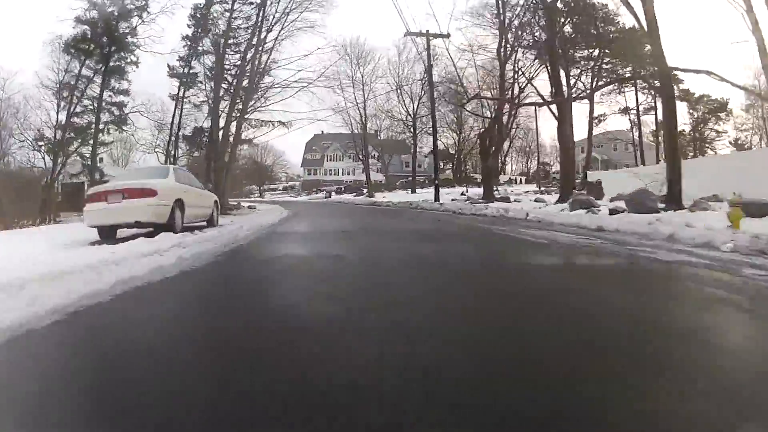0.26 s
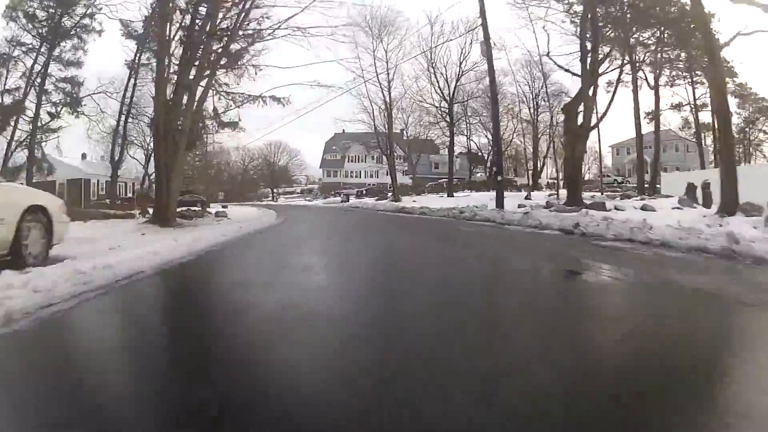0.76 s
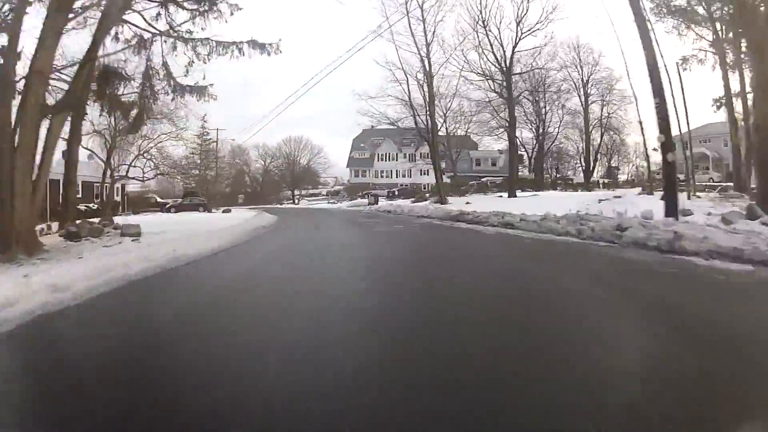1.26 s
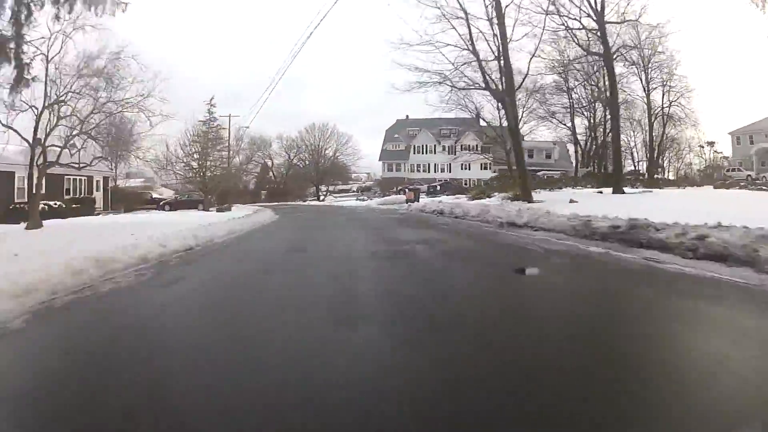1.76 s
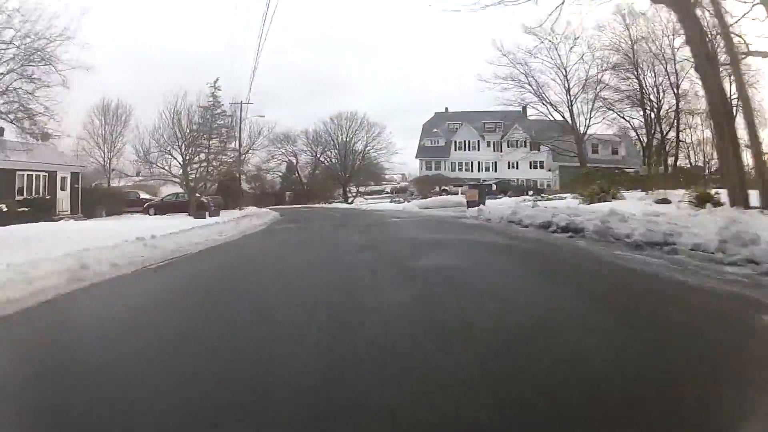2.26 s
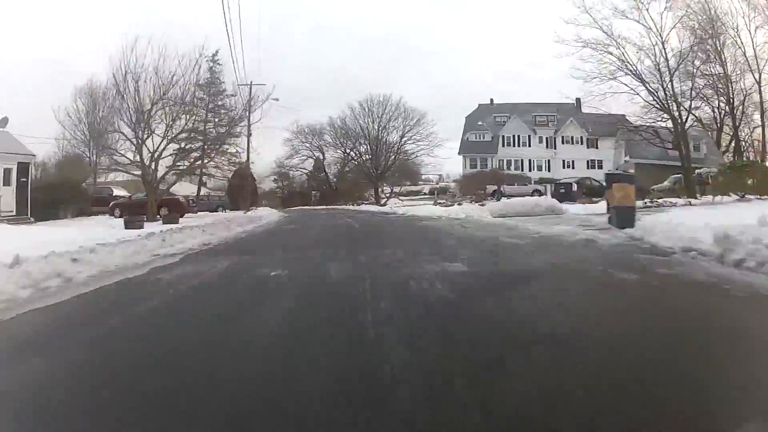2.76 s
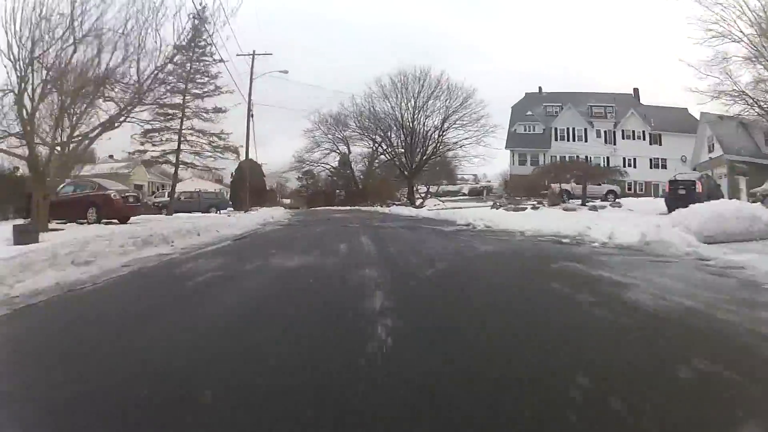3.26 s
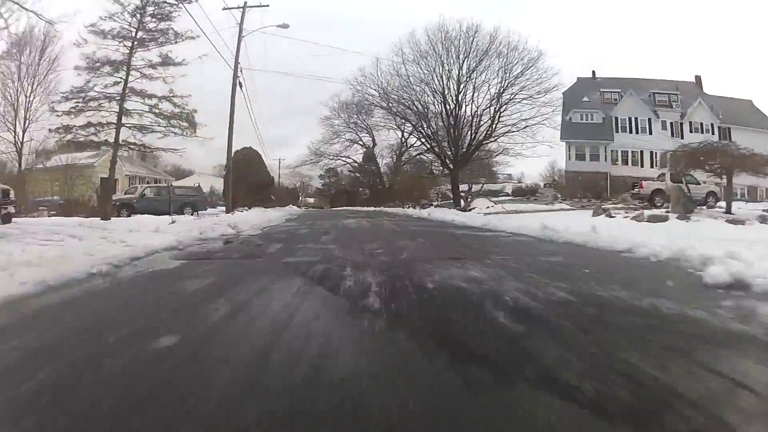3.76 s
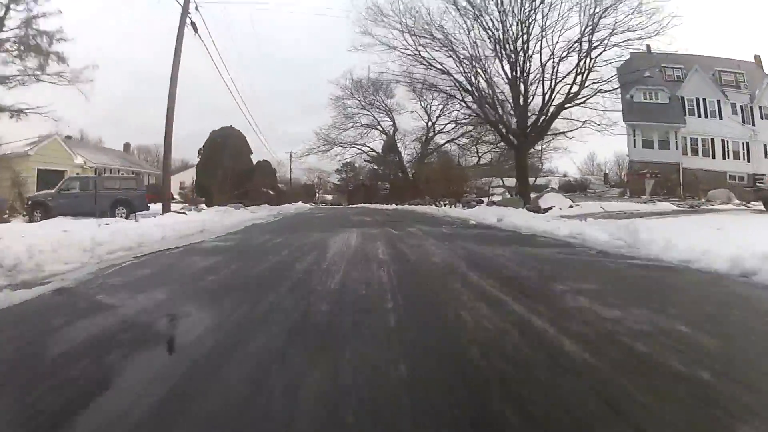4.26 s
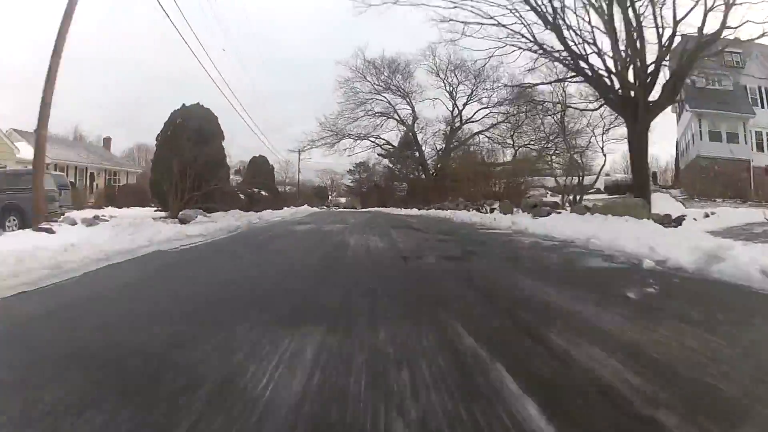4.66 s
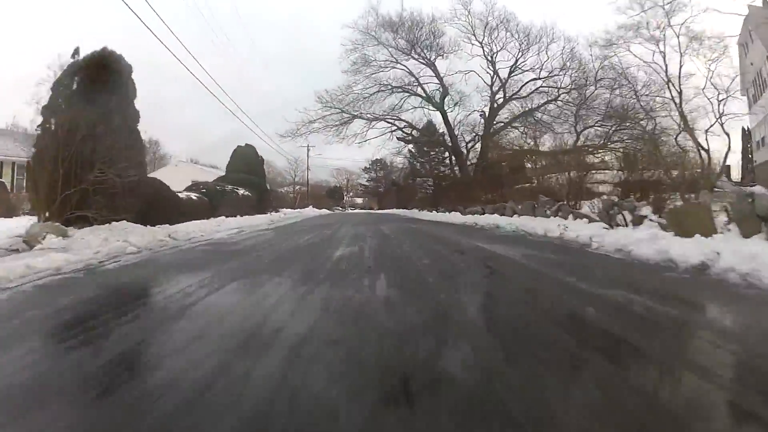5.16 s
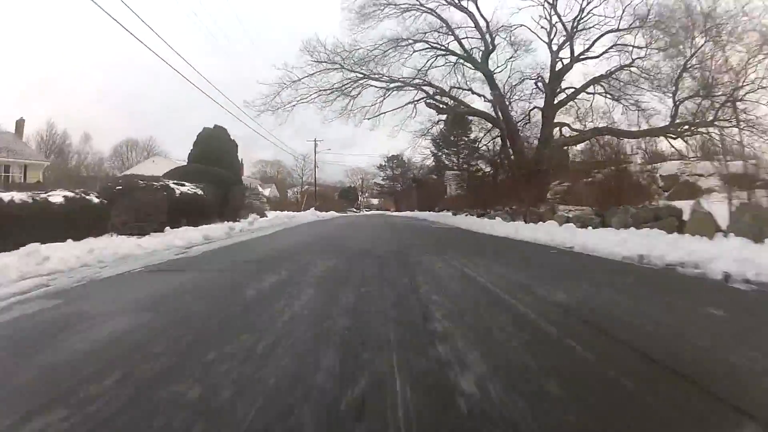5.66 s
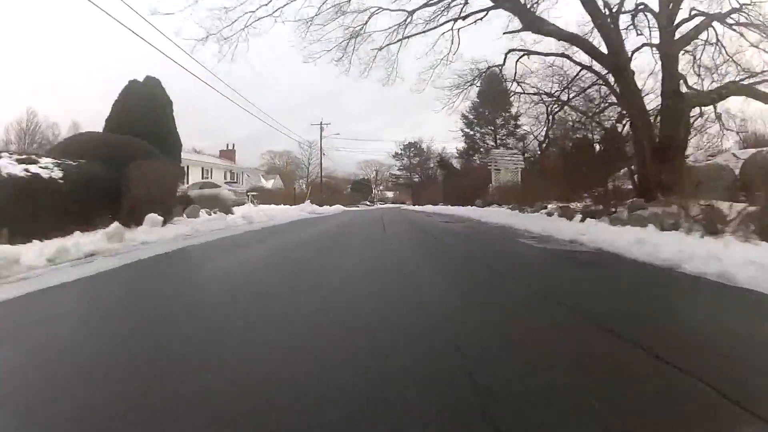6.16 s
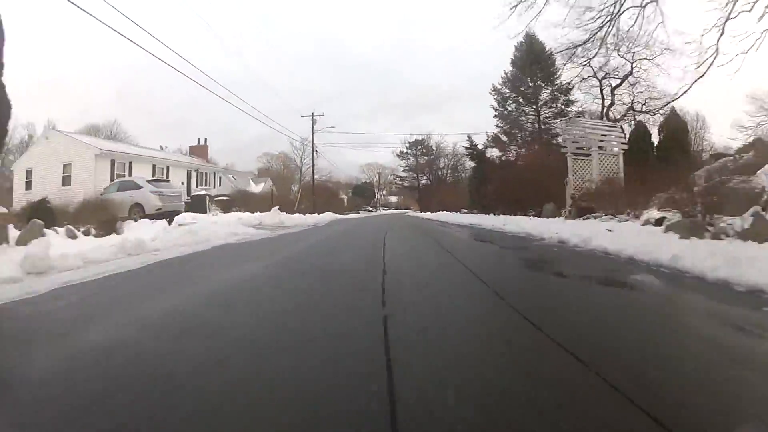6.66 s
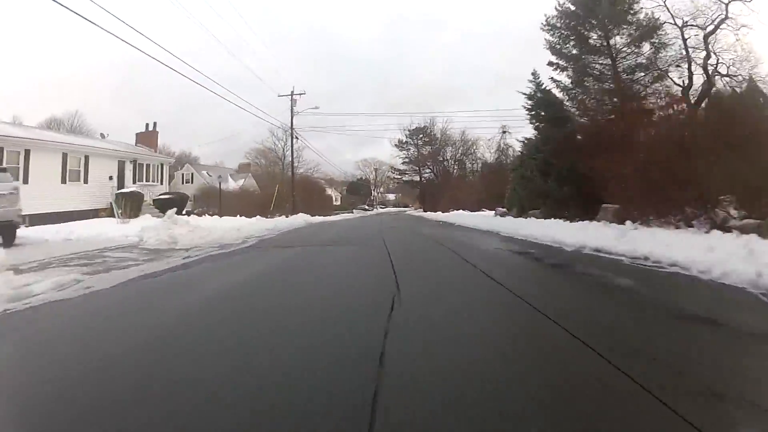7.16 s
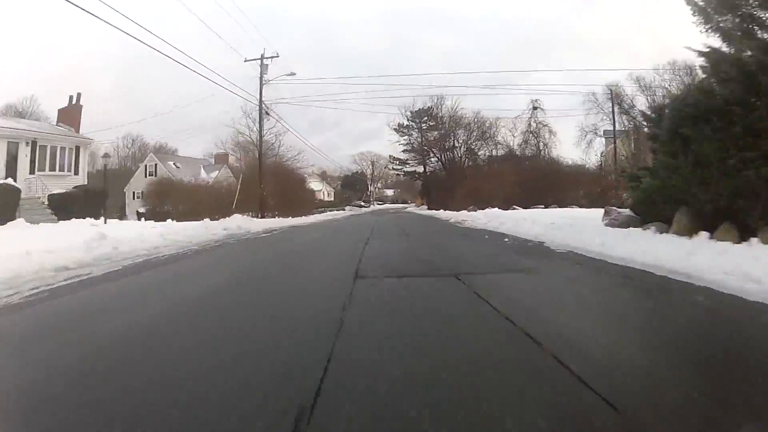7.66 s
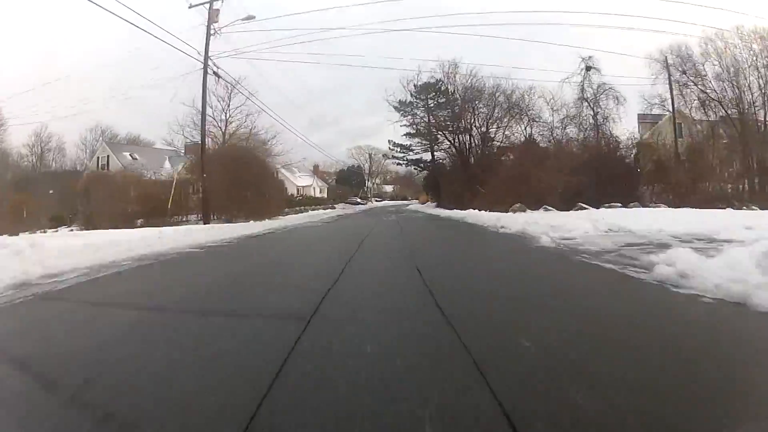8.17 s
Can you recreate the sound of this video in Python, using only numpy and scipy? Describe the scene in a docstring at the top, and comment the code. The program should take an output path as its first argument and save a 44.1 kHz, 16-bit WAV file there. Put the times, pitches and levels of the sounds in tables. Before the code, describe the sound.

Close on a car's body, deep road rumble and a coarse tyre roar run throughout over a wavering low hum. Wheels thud over bumps and the camera mount shudders and buzzes. Midway, rutted ice brings a cluster of heavy thumps, body knocks, a gear whine and slush spray. Later the engine pulls with a breathy rush. Lo-fi, with a thin sizzle on top.

```python
"""Car on a slushy street

Heard from a small camera fixed to the body: a drivetrain hum and gear whines over rumbling, roaring tyres.
Bumps ring the wheels and body, jolts set the camera mount swinging and chattering, and grains of slush
spray the wheel arches twice; then the engine pulls once, a rush of noise with two breathy intake whistles.
The camera samples at a low rate and holds each sample, which mirrors the sound into a thin sizzle."""
import sys
import numpy as np
from scipy import signal
from scipy.fft import rfft, irfft
from scipy.io import wavfile
from scipy.ndimage import uniform_filter1d

SR = 44100
rng = np.random.default_rng(int(sys.argv[2]) if len(sys.argv) > 2 else 0)


def inscribe(sig):
    """Save sig as 16-bit PCM at rate SR to the path in sys.argv[1].

    A 1-D sig is mono; a 2-D sig holds one channel per row.
    Samples are clipped to [-1, 1] before scaling.
    """
    pcm = np.round(np.clip(np.atleast_2d(sig).T, -1, 1) * 32767)
    wavfile.write(sys.argv[1], SR, pcm.astype(np.int16))


N = 370440  # samples
TIME = np.arange(N) / SR
BINS_HZ = np.maximum(np.arange(N // 2 + 1) * SR / N, 1)


def from_db(db):
    """Decibels to amplitude gain."""
    return 10 ** (np.asarray(db) / 20)


def rms_one(x):
    """Scale to unit rms."""
    return x / np.sqrt(np.mean(x ** 2) + 1e-20)


def in_time(rows):
    """Draw each column of a breakpoint table as a curve, sample by sample."""
    seconds, *columns = np.transpose(rows)
    return [np.interp(TIME, seconds, column) for column in columns]


def drift(rate_hz):
    """Slow random wander of rms 1: white noise rolled off above rate_hz."""
    rolloff = 1 + (BINS_HZ / rate_hz) ** 2
    return rms_one(irfft(rfft(rng.standard_normal(N)) / rolloff, N))


def coloured(x, spectrum, resonances=()):
    """Give x a broad spectrum with resonances standing on it, at rms 1."""
    hz, db = np.transpose(spectrum)
    power = from_db(np.interp(np.log(BINS_HZ), np.log(hz), db)) ** 2
    # roll off beyond both ends of the curve
    power = power / (1 + (BINS_HZ / (2 * hz[-1])) ** 4)
    power = power / (1 + (.5 * hz[0] / BINS_HZ) ** 4)
    for centre, width, peak_db in resonances:
        offset = 2 * (BINS_HZ - centre) / width
        power = power + from_db(peak_db) ** 2 / (1 + .5 * offset ** 2) ** 2
    return rms_one(irfft(rfft(x) * np.sqrt(power), N))


def noise(spectrum, resonances=()):
    """Steady coloured noise of rms 1."""
    return coloured(rng.standard_normal(N), spectrum, resonances)


def phase_of(hz):
    """Running phase of a moving pitch, in radians."""
    return 2 * np.pi * np.cumsum(hz) / SR


def tone(phase):
    """A sine of rms 1."""
    return np.sqrt(2) * np.sin(phase)


def band(hz, half_width_hz):
    """A narrow band of noise around a moving pitch, at rms 1."""
    phase = phase_of(hz)
    return rms_one(drift(half_width_hz) * np.cos(phase) + drift(half_width_hz) * np.sin(phase))


def swell(start, length, db, attack_s, release_s):
    """Gain that rises, holds until the length is up, then dies away exponentially."""
    age = TIME - start
    rise = np.clip(age / attack_s, 0, 1)
    fall = np.exp(-np.maximum(age - length, 0) / release_s)
    return from_db(db) * rise * fall


def together(gains):
    """Combine gains in power, as unrelated sounds add."""
    return np.sqrt(sum(g ** 2 for g in gains))


# hum following road speed, a nudge, cruising, then a pull: (time [s], pitch [Hz])
HUM_PITCH = [(0, 239.8), (.7, 236.2), (2.5, 244.9), (5.95, 247.7), (7.7, 271.8), (8.4, 276)]
# hum loudness: (time [s], level [dB])
HUM_LEVEL = [(0, -38.5), (1.1, -37), (1.6, -33.5), (5.9, -34), (6.9, -40), (8.4, -43.5)]
# tones locked to the hum: (multiple of hum pitch, relative level [dB])
HUM_ORDERS = [(1, 0), (3.665, -11), (4, -20), (4.2, -12)]
# two gear whines, each a list of: (time [s], pitch [Hz], level [dB])
WHINES = [
    [(.4, 2108, -62), (1.1, 2140, -47), (2.1, 2190, -48), (2.7, 2213, -65)],
    [(3.5, 1919, -48), (4.0, 1919, -37), (5.2, 1903, -38), (5.8, 1888, -58)],
]


def drivetrain(jitter=0.0026, waver_db=2.5, whine_waver_db=2.0):
    """Wavering sines make a hum that climbs with speed, and gear whines that come and go."""
    hum_hz, = in_time(HUM_PITCH)
    hum_db, = in_time(HUM_LEVEL)
    phase = phase_of(hum_hz * (1 + jitter * drift(11.1)))
    hum = sum(tone(k * phase) * from_db(db + waver_db * drift(7.7)) for k, db in HUM_ORDERS)
    out = hum * from_db(hum_db)
    for rows in WHINES:
        hz, db = in_time(rows)
        meshing = (TIME > rows[0][0]) & (TIME < rows[-1][0])
        whine = tone(phase_of(hz + 5 * drift(43)))
        out = out + meshing * whine * from_db(db + whine_waver_db * drift(13))
    return out


# spectrum shape of the road rumble: (frequency [Hz], relative density [dB per Hz])
RUMBLE_COLOUR = [(22, -11), (48, -11.5), (60, -8), (92, -7), (110, 1), (135, -2.5), (152, -0.5),
                 (170, -7.5), (225, -11), (290, -17), (350, -26), (600, -40.5)]
# spectrum shape of the tread roar: (frequency [Hz], relative density [dB per Hz])
ROAR_COLOUR = [(200, -38), (355, -9), (400, 1), (490, -2.5), (560, 2.5), (755, -4), (850, 4.5), (1110, 2),
               (1380, -3.5), (1650, 2), (2130, -2.5), (2700, -8.5), (3600, -18), (4500, -20.5), (5800, -24)]
# body panels that colour the roar: (centre [Hz], width [Hz], relative peak [dB])
PANELS = [(629, 23.5, 9.5), (993, 54, 10.5), (1796, 116, 6), (1931, 52, 7), (2309, 48, 2.5),
          (3147, 108, -8), (3460, 270, -14.5)]


def tyres(rumble_db=-26.5, roar_db=-30.5, roar_db_per_doubling=7, uneven_db=1.1, flutter_db=0.63,
          tread_order=3.95, tread_width_hz=45, tread_db=-13.5):
    """Road texture shakes the body; the tread roars through its panels, louder with speed."""
    rumble = noise(RUMBLE_COLOUR)
    # level the rumble over short spans so that it stays steady
    rumble = rumble / np.sqrt(uniform_filter1d(rumble ** 2, size=SR // 7))
    asphalt = from_db(rumble_db + uneven_db * drift(5.6))
    # a stretch of rutted ice adds rumble
    ruts = swell(3.9, length=0.67, db=-25.5, attack_s=0.32, release_s=0.21)
    # unevenly spaced tread blocks sing in a band that rises with speed
    hum_hz, = in_time(HUM_PITCH)
    tread = from_db(tread_db) * band(tread_order * hum_hz, tread_width_hz)
    roar = (noise(ROAR_COLOUR, PANELS) + tread) * from_db(flutter_db * drift(25))
    speed_doublings = np.log2(hum_hz / np.median(hum_hz))
    roar_gain = from_db(roar_db + roar_db_per_doubling * speed_doublings)
    return rumble * together([asphalt, ruts]) + roar * roar_gain


# jolts to the mount: (time [s], length [s], swing level [dB], buzz level [dB])
JOLTS = [(.272, .47, -27.5, -50.5), (0.798, 0.25, -27, -68), (2.19, 0.91, -26, -56.5),
         (3.758, 0.31, -30, -65), (4.157, .27, -25, -48), (4.44, .42, -26.5, -54.5),
         (5.69, 0.092, -27, -51), (6.121, 0.45, -19, -48.5), (6.91, 0.088, -20.5, -59),
         (7.802, 0.58, -26, -55)]
# spectrum shape of the chatter: (frequency [Hz], relative density [dB per Hz])
BUZZ_COLOUR = [(2500, -17), (3500, 4.5), (4150, -12), (4850, 4), (5800, -17)]


def mount(mount_hz=33.68, wander_hz=1.68, throb_db=3.0, sway_db=-34.5, sway_width_hz=5.7,
          sharpness=1.8, uneven_db=1.5):
    """The mount swings at its own pitch; jolted loose, it chatters twice in every cycle."""
    phase = phase_of(mount_hz + wander_hz * drift(6.08))
    jolted = together(swell(s, length, db, attack_s=0.03, release_s=0.041) for s, length, db, _ in JOLTS)
    # between jolts the road keeps it swaying
    sway = from_db(sway_db) * band(np.full(N, mount_hz), sway_width_hz)
    swing = tone(phase) * jolted * from_db(throb_db * drift(15)) + sway
    loose = together(swell(s, length, db, attack_s=.015, release_s=.025) for s, length, _, db in JOLTS)
    # one hard touch and one lighter touch, half a cycle apart
    hard_touch = np.exp(sharpness * np.cos(phase))
    light_touch = 0.43 * np.exp(-sharpness * np.cos(phase))
    contacts = (hard_touch + light_touch) * from_db(uneven_db * drift(150)) * rng.standard_normal(N)
    return swing + loose * coloured(contacts, BUZZ_COLOUR)


def blows(events, modes, contact_s, after_share, count, mode_spread_db=2.5):
    """Each blow is one push and a few mostly weaker ones close behind, ringing decaying modes."""
    out = np.zeros(N + SR)
    t = np.arange(SR // 3) / SR
    for s, peak_db in events:
        delays = np.append(0, rng.uniform(0, contact_s, count))
        sizes = np.append(1, after_share * rng.standard_normal(count))
        age = np.maximum(t - delays[:, None], 0)
        hit = np.zeros(len(t))
        for k, (hz, db, t60) in enumerate(modes):
            ringing = from_db(-60 * age / t60) * np.sin(2 * np.pi * hz * age)
            # mode strengths differ from blow to blow; neighbours start in opposite directions
            strength = from_db(db + rng.normal(0, mode_spread_db)) * (-1) ** k
            hit += strength * (sizes @ ringing)
        start = int(s * SR)
        # the event level sets the height of the whole blow
        out[start:start + len(t)] += from_db(peak_db) * hit / np.abs(hit).max()
    return out[:N]


# wheels over bumps: (time [s], peak level before the thump trim [dB])
BUMPS = [(0.284, -7.5), (0.544, -9.5), (0.884, -11), (2.315, -7), (2.775, -11.5), (2.864, -8.5),
         (3.715, -17), (4.133, -6.5), (4.173, -2.5), (4.208, -8.5), (4.234, -7), (4.331, -5.5),
         (5.535, -12.5), (6.164, -8), (6.214, -5), (6.917, -11), (7.608, -13), (7.752, -8), (7.989, -12.5),
         (8.261, -7.5)]
# ringing of tyre and suspension: (frequency [Hz], relative level [dB], t60 [s])
WHEEL_MODES = [(69, -7, 0.057), (118, 2.5, 0.12), (125.3, -0.5, 0.11), (149.6, -6, 0.094), (201, -8, 0.052)]
# knocks in the body: (time [s], peak level before the knock trim [dB])
KNOCKS = [(3.182, -23), (4.174, -19), (4.214, -16), (4.244, -11.5), (4.274, -29), (5.676, -17.5),
          (6.169, -21), (6.211, -16)]
# ringing of the body: (frequency [Hz], relative level [dB], t60 [s])
KNOCK_MODES = [(325, 0, 0.043), (424, 2, 0.11), (525, 7, 0.038), (647, 5, 0.078), (720, 2, 0.022),
               (950, 11, 0.041), (1010, -7, 0.029)]


def bumps(thump_db=-3.0, knock_db=-2.0):
    """Seams and ice thump the wheels into low ringing; knocks ring the body higher up."""
    thumps = blows(BUMPS, WHEEL_MODES, contact_s=.04, after_share=0.28, count=7)
    knocks = blows(KNOCKS, KNOCK_MODES, contact_s=0.01396, after_share=0.16, count=10)
    return from_db(thump_db) * thumps + from_db(knock_db) * knocks


# slush thrown into the wheel arches: (time [s], length [s], level [dB])
SPLASHES = [(3.138, 0.044, -33.5), (3.948, 0.033, -25), (4.01, 0.033, -26), (4.196, 0.05, -27.5),
            (4.29, 0.25, -28.5), (4.368, 0.073, -33), (5.081, 0.03, -31), (5.2, 0.059, -32.5),
            (5.324, .2, -26.5), (5.55, 0.29, -35.5)]
# spectrum shape of the spray: (frequency [Hz], relative density [dB per Hz])
SPRAY_COLOUR = [(400, -14), (900, 4.5), (1400, 0.5), (1820, 13.5), (2130, 2.5), (2350, -2), (3000, -2),
                (4000, -13.5), (5000, -14.5), (5800, -18.5)]
# wheel arches ringing under the spray: (centre [Hz], width [Hz], relative peak [dB])
ARCHES = [(1760, 110, 5.5), (2350, 99, 7)]


def slush(drops_per_s=3000, clump_db=1.0, shed_db=-12, shed_s=0.55):
    """Wet grains pelt the wheel arches in clumps; the tread then sheds a thinner trail of drops."""
    sizes = from_db(1.65 * np.minimum(rng.exponential(1, N), 5)) * rng.choice([-1, 1], N)
    landing = rng.random(N) < drops_per_s / SR
    drops = sizes * landing * from_db(clump_db * drift(25))
    bursts = [swell(s, length, db, attack_s=0.029, release_s=0.044) for s, length, db in SPLASHES]
    trails = [swell(s, length, db + shed_db, length, shed_s) for s, length, db in SPLASHES]
    return coloured(drops, SPRAY_COLOUR, ARCHES) * together(bursts + trails)


# spectrum shape of the engine rush: (frequency [Hz], relative density [dB per Hz])
RUSH_COLOUR = [(250, -6), (500, 0), (740, -4), (950, 9), (1250, -0.5), (1850, 9), (2400, -3), (3300, -9.5),
               (4500, -23), (5800, -23)]
# two stretches of breathy intake whistle within the one pull, the second gliding upward:
# (time [s], length [s], level of the upper band [dB], pitch [Hz], rise [Hz per s])
WHISTLES = [(6.57, 0.64, -52.5, 4570, -15), (7.46, .62, -50.5, 4560, 299)]


def intake(breadth_hz=200, lower_hz=4100, lower_breadth_hz=40, lower_db=-3.0, gusty_db=1.5):
    """As the throttle opens the engine rushes and the air hisses around two loose pitches."""
    load = swell(6.28, length=1.49, db=-30.5, attack_s=0.85, release_s=0.37)
    # the steady lower pitch follows the load
    lower = from_db(lower_db) * load / load.max() * band(np.full(N, lower_hz), lower_breadth_hz)
    whistle = np.zeros(N)
    for s, length, db, hz, rise in WHISTLES:
        upper = band(hz + rise * np.clip(TIME - s, 0, length), breadth_hz)
        whistle += swell(s, length, db, attack_s=0.02, release_s=0.22) * (upper + lower)
    return noise(RUSH_COLOUR) * load + whistle * from_db(gusty_db * drift(4.8))


def scene():
    """Everything reaches the one microphone through the car's body and the air around it."""
    return (drivetrain() + tyres() + mount() + bumps() + slush() + intake())[None]


def record(dry, band_edge_hz=5600, held_rate_hz=12000, cutoff_hz=15300):
    """Narrow-band sampling with each sample held, mirroring the band upward, then a steep top cut."""
    narrow = irfft(rfft(dry) / np.sqrt(1 + (BINS_HZ / band_edge_hz) ** 36), N)
    coarse = signal.resample(narrow, round(N * held_rate_hz / SR), axis=-1)
    # each sample fills four steps, then the result returns to the output rate
    held = signal.resample(np.repeat(coarse, 4, axis=-1), N, axis=-1)
    top_cut = signal.ellip(14, .1, 90, cutoff_hz, fs=SR, output="sos")
    return signal.sosfilt(top_cut, held)


dry = scene()
out = record(dry)
inscribe(out)
```